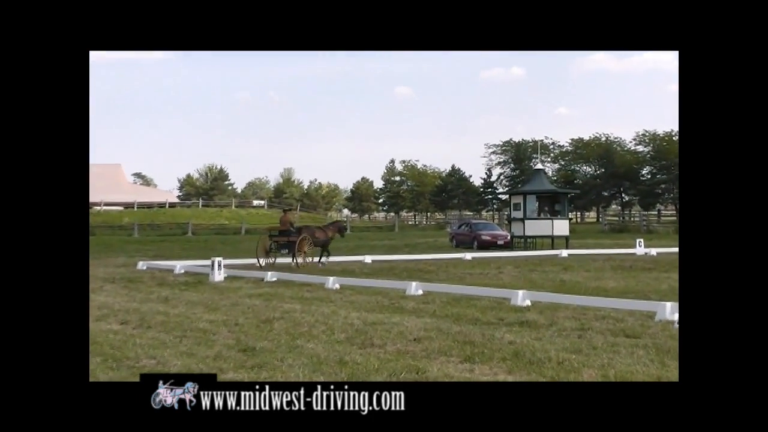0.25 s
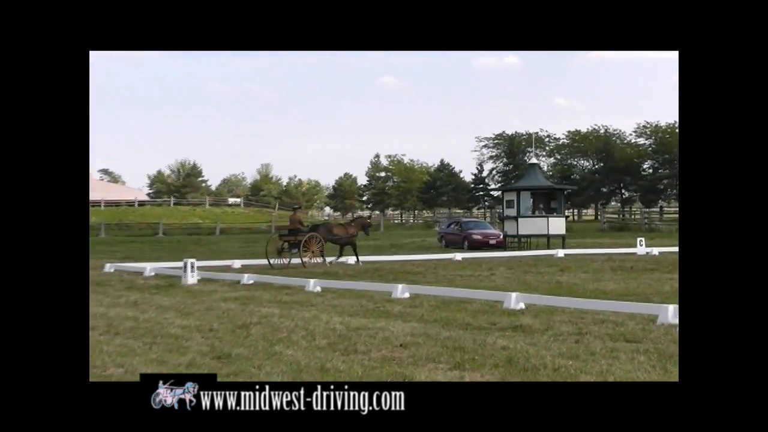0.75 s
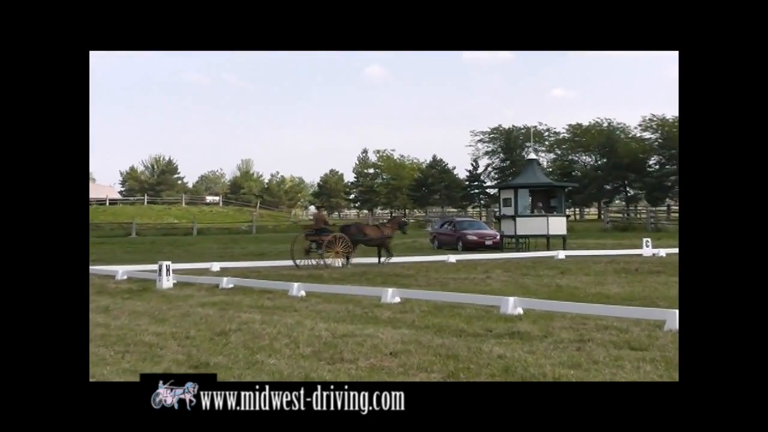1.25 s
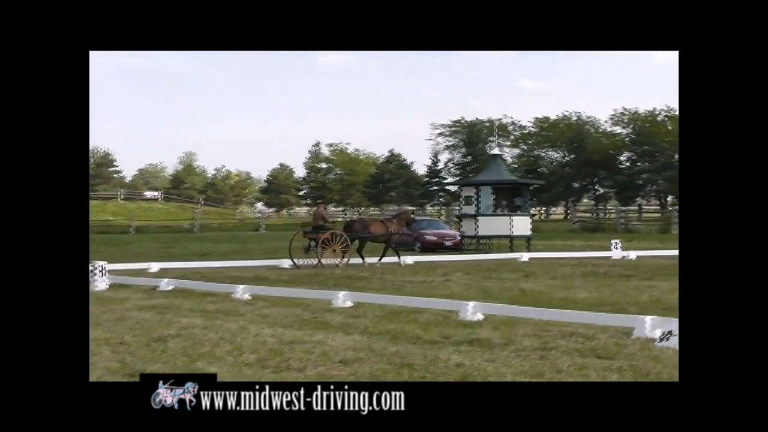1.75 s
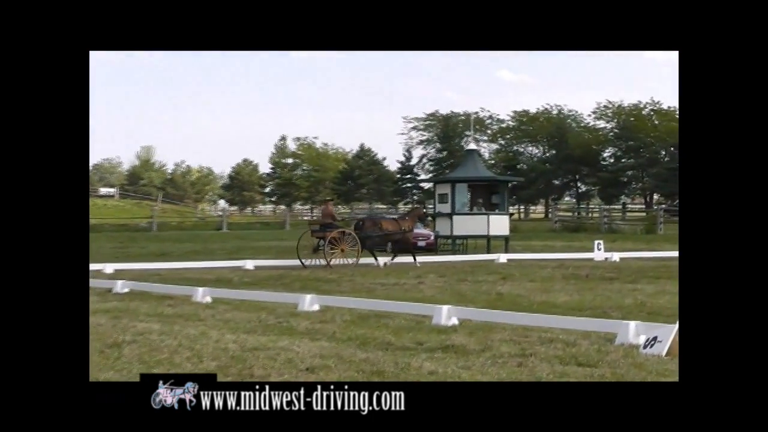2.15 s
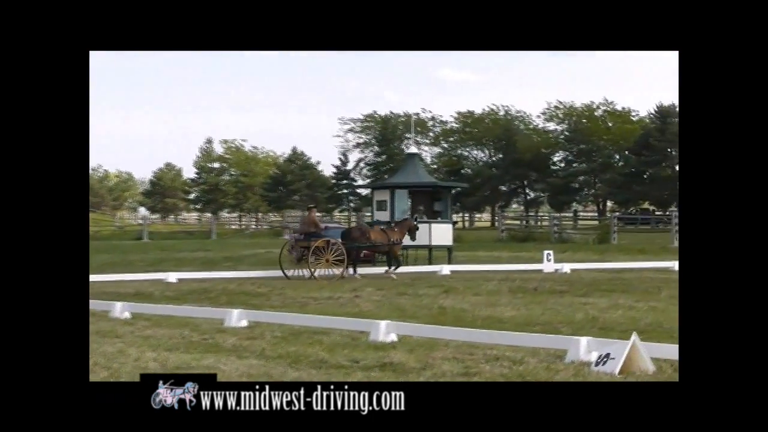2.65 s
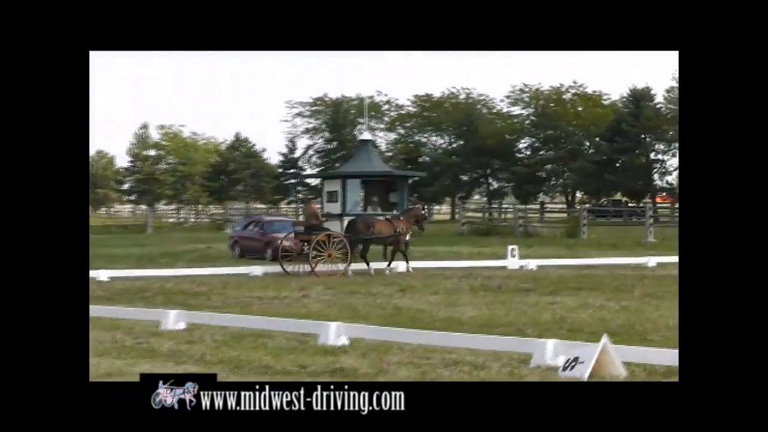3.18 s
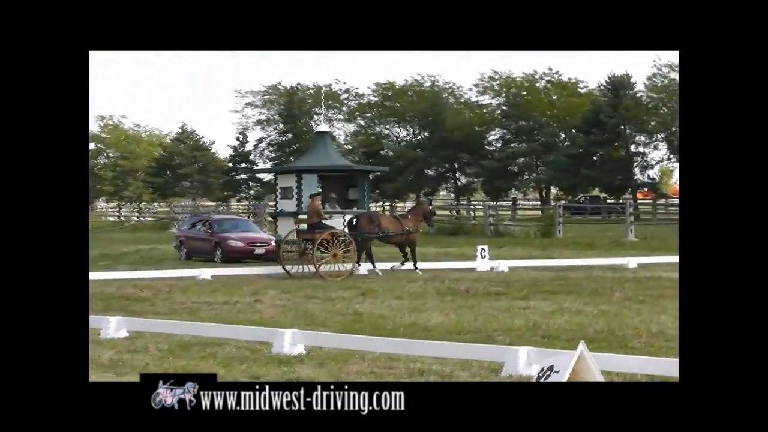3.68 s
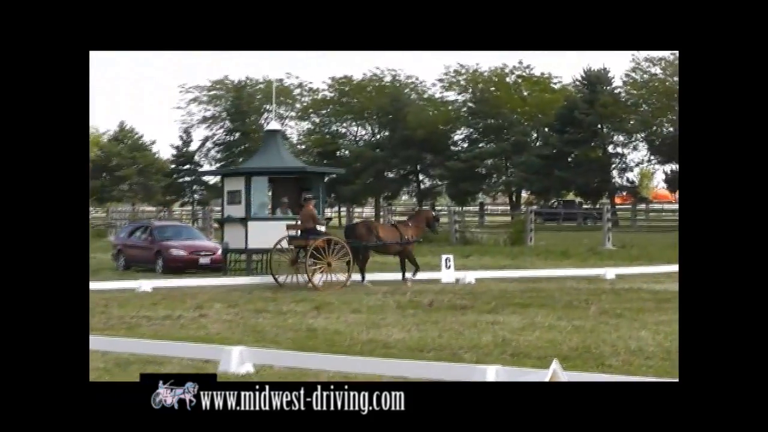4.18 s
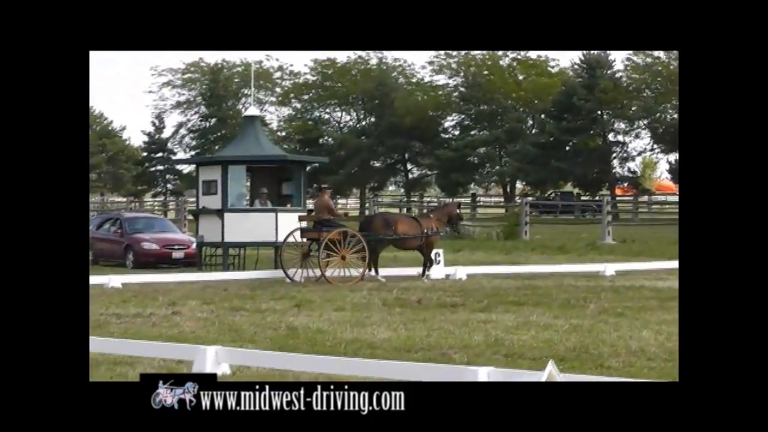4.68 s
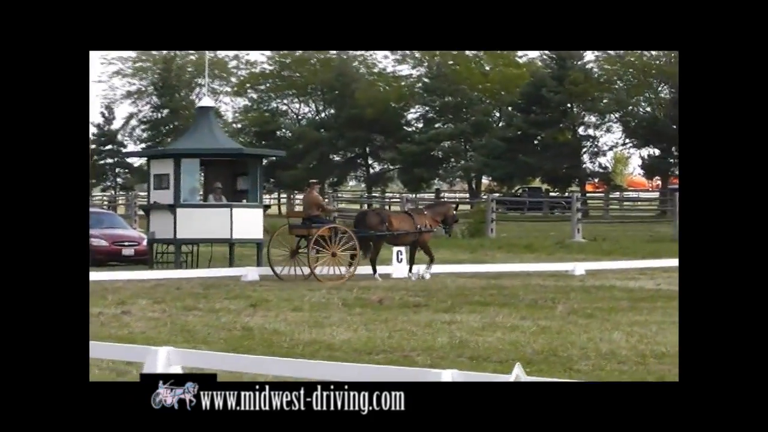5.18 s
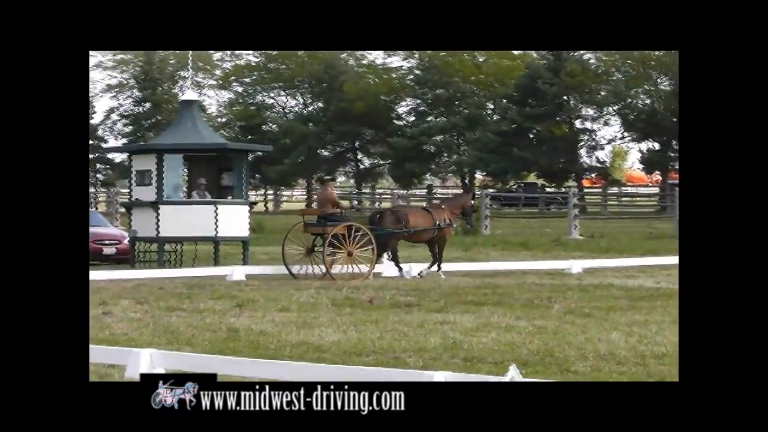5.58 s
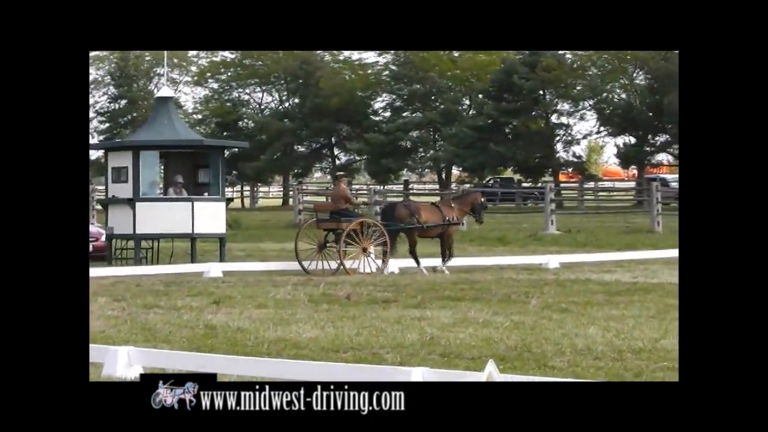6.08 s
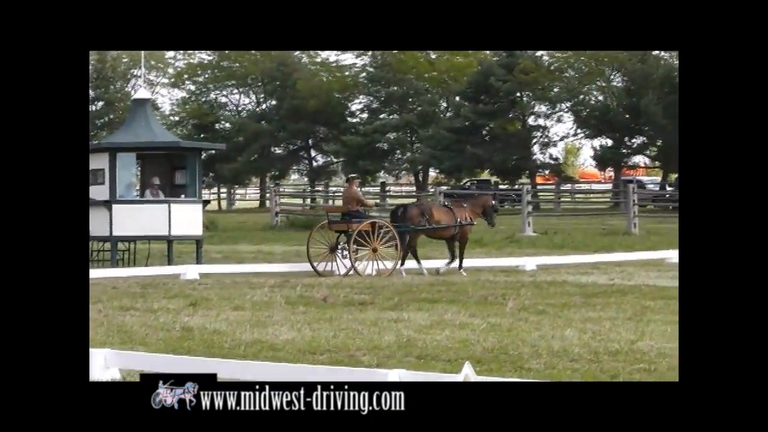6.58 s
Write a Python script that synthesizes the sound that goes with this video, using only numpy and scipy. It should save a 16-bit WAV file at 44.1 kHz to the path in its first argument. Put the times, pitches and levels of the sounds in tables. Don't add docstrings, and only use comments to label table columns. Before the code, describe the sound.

Outdoors in an open summer field, captured in stereo by an exposed camera microphone. Throughout the nearly seven seconds, a light propeller aircraft drones: low buzzing blade and exhaust tones inside a rough, turbulent roar, fluttering in strength and sinking slightly in pitch, coloured by a hollow, slowly shifting ground echo. From 0 to 0.9 seconds wind hits the microphone in dense, deep thumps; later bumps come around 2.1, 3.7 and 6.6. Close on the right, a cricket gives very high, short pulsing trills about four times a second, over a faint insect chorus. Leaves rustle softly, mainly early. Tiny dry ticks are scattered throughout. A thin bird peep comes at 2.3, low pips at 4.9 and a quick pair at 6.2. Faint sparrow chatter and lower crickets increase after 3.5. A crisp twig snap stands out at 5.8, slightly right. The horse and carriage are not heard.

```python
import sys
import numpy as np
from scipy import signal
from scipy.fft import rfft, irfft, next_fast_len
from scipy.io import wavfile
from scipy.ndimage import uniform_filter1d, map_coordinates

SR = 44100
rng = np.random.default_rng(int(sys.argv[2]) if len(sys.argv) > 2 else 0)


def dump(signal):
    limited = np.clip(np.atleast_2d(signal).T, -1, 1)
    pcm = np.round(limited * 32767).astype(np.int16)
    wavfile.write(sys.argv[1], SR, pcm)


def invert_db(x):
    u = np.asarray(x, float) / 20
    return 10 ** u


N = 301203

# f/Hz, density/dB
AIR_SPECTRUM = [(1530, -37), (2600, -3.5), (3280, -7.5), (4360, -2.5), (4730, -1.5), (5490, -4), (6980, -8),
                (8800, 0.5), (9990, -10.5), (14100, -12.5), (15500, -14.5)]
# f/Hz, density/dB
LEAF_SPECTRUM = [(5000, -120), (7000, -8), (9500, 6.5), (11000, 6), (12500, -3), (15000, -19),
                 (16000, -120)]
# middle/s, length/s, peak/dB
RUSTLES = [(.17, 0.18, -69), (.48, 0.35, -70), (.84, .2, -67), (1.15, 0.22, -70), (1.55, 0.33, -77),
           (1.85, 0.13, -71), (2, 0.18, -70), (2.33, .15, -77), (2.8, .3, -90), (3.4, .2, -75),
           (6.7, .15, -79)]
# f/Hz, density/dB
CHATTER_SPECTRUM = [(2300, -120), (2900, -5), (3900, 1.5), (5000, -3), (5600, -14), (6500, -120)]
# middle/s, length/s, peak/dB
SPARROW_BOUTS = [(.62, 0.14, -72), (.97, 0.11, -66), (1.6, 0.32, -71), (3.3, 0.22, -78), (4.02, 0.19, -68),
                 (4.45, 0.41, -73), (4.93, 0.34, -68), (5.5, 0.21, -71), (6.05, 0.49, -66.5),
                 (6.32, 0.11, -74), (6.58, 0.15, -63), (6.83, .1, -68)]
# middle/s, length/s, peak/dB
LOW_CRICKET_BOUTS = [(1, .4, -91), (1.45, .4, -81), (2.45, 0.25, -79), (2.78, .06, -72), (2.95, .1, -71),
                     (3.08, .08, -70), (3.26, .14, -70), (3.39, .07, -72), (3.6, 0.1, -66), (3.78, .1, -72),
                     (3.96, .3, -68), (4.2, .07, -69), (4.38, .16, -69.5), (4.55, 0.12, -67),
                     (4.95, 0.45, -71), (5.5, .4, -72), (6, 0.45, -70), (6.28, 0.21, -64), (6.6, 0.39, -69),
                     (6.83, 0.092, -70)]
# t/s, length/s, from f/Hz, to f/Hz, peak/dB
PEEPS = [
    (0.388, .045, 5270, 5100, -68),
    (1.128, 0.021, 5200, 5200, -69.5),
    (2.315, 0.02, 5420, 5180, -56),
    (3.058, 0.019, 5140, 5150, -66),
    (6.227, 0.032, 5300, 5420, -60),
    (6.25, 0.037, 5180, 5030, -65),
]
# t/s, length/s, from f/Hz, to f/Hz, peak/dB
PIPS = [
    (2.066, .035, 7000, 6400, -70),
    (4.886, .03, 4270, 3550, -58),
    (4.945, .02, 3300, 3850, -61),
    (6.7, .025, 5900, 5800, -66),
    (6.7, .03, 11800, 11500, -70),
    (.05, .02, 10300, 9500, -61),
]
# t/s, peak/dB, L-R/dB, t60/s, wood/dB
CRACKS = [(5.833, -32.5, -5, 0.0048, 1.5), (.886, -47, -3, 0.003, -14), (1.45, -43, -4, 0.0033, -16),
          (2.025, -50, -6, .003, -12), (2.056, -49, -5, .003, -13), (3.094, -57, -9, .003, -14),
          (.042, -46, 0, .002, -8), (.479, -48, -4, .003, -14), (.783, -56, -3, .003, -14),
          (.82, -51, -3, .003, -14), (2.739, -52, -4, .003, -14), (3.311, -52, -2, .003, -14),
          (3.634, -48, -3, .003, -14), (3.814, -53, -1, .003, -14), (4.337, -53, -2, .003, -12),
          (5.8348, -40.5, -5, .004, 5)]
# f/Hz, gain/dB
CRACK_COLOUR = [(600, -40), (1600, 17.5), (2200, 11), (3000, -11), (4000, -2), (7000, 3.5), (11500, -8),
                (16000, -29)]
# t/s, wing strokes, peak/dB
CHIRPS = [(0.0752, 6, -47), (0.3132, 6, -48), (0.5492, 6, -47), (0.793, 5, -46.5), (1.04, 6, -47.5),
          (1.2945, 6, -46), (1.548, 6, -46), (1.7793, 5, -45.5), (2.023, 7, -45), (2.2657, 6, -45),
          (2.4906, 7, -46), (2.737, 8, -44.5), (2.9995, 6, -45.5), (3.2394, 5, -45), (3.4716, 6, -45),
          (3.7012, 8, -46), (3.9644, 7, -44), (4.224, 7, -45), (4.4773, 7, -45.5), (4.76, 6, -44.5),
          (4.9883, 6, -46), (5.221, 6, -44.5), (5.4391, 6, -46), (5.677, 7, -44.5), (5.9327, 7, -46),
          (6.179, 7, -44), (6.425, 6, -44), (6.6629, 7, -46)]
# t/s, level/dB
WIND_STRENGTH = [(0.0, -23.5), (0.15, -29.5), (0.5, -32), (0.68, -31), (1.23, -37), (1.75, -35.5),
                 (2.5, -36.5), (2.76, -33), (2.99, -37), (3.65, -37.5), (3.99, -42), (4.37, -34),
                 (4.75, -41), (5.16, -34), (5.8, -43.5), (6.68, -32), (6.83, -37)]
# f/Hz, density/dB
RUMBLE_SPECTRUM = [(10, -120), (18, 9), (40, 2), (80, -5.5), (160, -16), (400, -66), (600, -120)]
# t/s, peak/dB, L-R/dB, f/Hz
THUMPS = [(.034, -10, 10, 38), (.085, -10, 5, 70), (.147, -9.5, 1, 81), (.19, -11.5, 2, 72),
          (.274, -3, -5, 58), (.316, -4, -4, 91.5), (.344, -11.5, 1, 67), (.422, -20, -12, 56),
          (.564, -5.5, -3, 86), (.614, -12, 8, 65), (.664, -4, -1, 40), (.681, -3.5, 1, 36),
          (.763, -12, -2, 58.5), (.831, -18, 17.5, 68), (1.707, -19, 2, 50), (1.735, -17, -1, 47),
          (1.951, -21.5, 10, 48.3), (2.098, -6.5, 0.5, 66), (2.138, -14.5, -11, 39), (2.439, -15, -4, 59),
          (2.63, -13.5, 0, 65), (2.713, -19.5, -18, 36.3), (2.905, -18, -5, 47.4), (3.651, -8.5, 8, 88.5),
          (3.68, -6, 5, 50), (3.802, -9, 2, 69), (4.211, -17.5, 0, 71), (5.064, -16, 8, 64),
          (6.25, -14, 6, 39), (6.641, -6, 3, 57), (6.39, -24, 0, 50), (6.505, -20, 2, 45),
          (.71, -13, 2, 40), (1.84, -22, 2, 35), (2.76, -28, -6, 45), (5.18, -24, 12, 55)]
# t/s, rate/Hz
BLADE_RATE = [(0, 86), (0.8, 84.8), (1.6, 84.08), (2.8, 83.25), (4.4, 82.55), (5.2, 81.85), (6, 81.15),
              (6.83, 80)]
# t/s, propeller level/dB, exhaust level/dB
TONE_LEVELS = [(0, -35.5, -50.5), (.5, -39, -39), (.93, -42, -42.5), (1.55, -36, -46), (2.17, -44.5, -52.5),
               (2.79, -39, -55), (3.1, -34.5, -43), (3.72, -38, -49), (4.1, -32.5, -41), (4.4, -40, -34),
               (4.65, -38.5, -47), (4.96, -35.5, -34.5), (5.58, -40.5, -37.5), (5.89, -37.5, -37.5),
               (6.5, -36, -32.5), (6.83, -53, -37)]
# multiple of blade rate, rms/dB
BLADE_ORDERS = [(2, -49.5), (4, -53), (6, -50.5), (7, -61.5), (8, -54.5), (9, -51.5), (10, -69)]
# multiple of a third of the firing rate, rms/dB
EXHAUST_ORDERS = [(3, -38.5), (9, -53.5), (15, -54), (18, -67), (24, -52.5), (36, -59.5), (50, -69.5),
                  (51, -75), (52, -58), (53, -70), (56, -63), (60, -66)]
# multiple of firing rate, middle/s, length/s, peak/dB
EXHAUST_GLINTS = [(16, 1.52, 0.59, -46), (16, 3.5, 1.2, -57), (16, 4.05, 0.49, -50), (16, 5.01, 1.5, -48),
                  (16, 5.94, 0.86, -46), (16, 6.59, 0.63, -45.5), (17, 0.16, 2, -64), (17, 8.2, 0.36, -42),
                  (18, 1.52, 0.97, -49), (18, 2.41, 0.33, -52), (18, 3.2, 0.51, -51), (18, 4.2, 0.63, -57),
                  (19, 2.9, 0.45, -56), (19, 3.66, 1.7, -56), (19, 14, 0.35, -56), (20, 1.64, 0.56, -54.5),
                  (17, 0.92, 0.69, -54), (17, 3.8, 0.78, -52), (21, 6.15, 0.55, -56), (13, 7.1, 1.1, -48),
                  (12, 1.56, .5, -51), (13, 3.62, 0.34, -49.5)]
# multiple of blade rate, middle/s, length/s, peak/dB
BLADE_GLINTS = [
    (26, 5.76, 0.55, -55.5),
    (30, 4.6, 0.53, -66),
    (30, 6.1, 0.49, -63),
    (30, 6, .4, -64),
    (31, 6.8, 0.65, -76),
]
# t/s, level/dB, clear air/dB
ROAR_LEVELS = [(0.0, -38, -12), (0.32, -36.5, -13.5), (0.64, -40.5, -8), (1.5, -36.5, -9.5), (2, -40, -9),
               (2.8, -40, -7), (3, -36, -7), (3.56, -38, -8.5), (4.07, -34.5, -10.5), (4.7, -38.5, -4.5),
               (5, -35, -7.5), (5.54, -37, -10.5), (5.9, -34, -8.5), (6.83, -36.5, -7)]
# f/Hz, density/dB
BODY_SPECTRUM = [(60, -120), (90, -6), (200, 1), (420, 0), (750, 0.5), (1200, -8.5)  , (1800, -21),
                 (2500, -120)]
# f/Hz, density/dB
EDGE_SPECTRUM = [(700, -120), (1000, -11), (1600, -4), (2050, -12.5), (2400, -25), (3000, -32),
                 (5000, -40.5), (6000, -120)]
# f/Hz, density/dB
RASP_SPECTRUM = [(1300, -120), (1600, -6), (2000, -6), (2250, -13), (2450, -22), (3000, -120)]
# middle/s, length/s, peak/dB
CLEARINGS = [(.05, 0.26, -50), (.45, 0.33, -52), (.95, 0.42, -52), (1.27, 0.12, -55), (1.552, 0.68, -54),
             (2.45, 0.21, -50.5), (3.15, 0.61, -59), (3.6, 0.16, -50), (4, 0.32, -49), (4.45, 0.4, -49.5),
             (4.9, .35, -50.5), (5.9, 0.55, -55), (6.3, 0.18, -70), (6.65, .4, -63)]
# t/s, lag/ms
GROUND_LAG = [(0, 4.26), (1.1, 4.574), (3.4, 5.43), (5.7, 5.706), (6.83, 5.95)]

FIRING_PER_BLADE = 1.2345
THIRD_DB, THIRD_FADE_DB_PER_S = -3, 1.3
IN_STEP_DB, OPPOSE_PER_DB = -11.5, 0.01
FLUTTER_DB, FLUTTER_SPREAD_DB, FLUTTER_HZ = 8, 1.5, 50
CORE_DB, CORE_PITCH_RATIO = -12, 1.18
PORT_TOP_HZ = 420
TURF_LAG_S, TURF_SHARE = .00037, .8


def unit(x):
    return x / np.sqrt(np.mean(x ** 2) + 1e-20)


def curves(rows):
    s, *cols = np.transpose(rows)
    return [np.interp(np.arange(N) / SR, s, c) for c in cols]


def wobble(rate_hz):
    knots = rng.standard_normal(int(N * rate_hz / SR) + 4)
    return map_coordinates(knots, [np.arange(N) * rate_hz / SR])


def swell(middle_s, length_s, db):
    return invert_db(db) * np.exp(-.5 * ((np.arange(N) / SR - middle_s) / (0.28 * length_s)) ** 2)


def bouts(rows, rest_db):
    return invert_db(rest_db) + sum(swell(*row) for row in rows)


def sides(left_db, right_db):
    return invert_db(np.array([[left_db], [right_db]]))


def filtered(x, response):
    m = next_fast_len(N + 8192)
    return irfft(rfft(x, m) * response(np.fft.rfftfreq(m, 1 / SR)), m)[..., :N]


def spectrum_db(rows, f_hz):
    hz, db = np.transpose(rows)
    return np.interp(np.log(f_hz + 1), np.log(hz), db)


def noise(spectrum, patchy_db, channels=1):
    z = signal.stft(rng.standard_normal((channels, N)), nperseg=512)[2]
    patches = uniform_filter1d(rng.standard_normal(z.shape[1:]), 5, 0)
    patches = unit(uniform_filter1d(patches, 16, 1))
    x = signal.istft(z * invert_db(patchy_db * patches), nperseg=512)[1][:, :N]
    return unit(filtered(x, lambda f: invert_db(spectrum_db(spectrum, f))))


def add(track, s, x):
    part = track[..., max(round(s * SR), 0):][..., :x.shape[-1]]
    part += x[..., :part.shape[-1]]


def glide(length_s, from_hz, to_hz):
    u = np.linspace(0, 1, int(length_s * SR))
    phase = 2 * np.pi * np.cumsum(from_hz + (to_hz - from_hz) * u) / SR
    return phase, np.sin(np.pi * u) ** 0.35


def chorus(hz, spread, rate_hz, length_s, count, bouts_db):
    out, t = np.zeros((2, N)), np.arange(N) / SR
    for tune, side, pace in rng.standard_normal((count, 3)):
        cycle = (rate_hz * (1 + 0.097 * pace) * t + 0.48 * wobble(5.4)) % 1
        beat = np.minimum(cycle / np.clip(rate_hz * length_s, .05, 1), 1)
        pitch_hz = hz * (1 + spread * np.clip(tune, -1.6, 1.6)) * (1 - 0.04 * (beat - .5))
        stroke = np.sin(np.pi * beat) * np.sin(2 * np.pi * np.cumsum(pitch_hz) / SR)
        out += stroke * invert_db(bouts_db * wobble(9.9)) * sides(1.9 * side, -1.5 * side)
    return unit(out)


def insects():
    high = chorus(hz=8530, spread=.036, rate_hz=18, length_s=0.023, count=40, bouts_db=5.0)
    low = chorus(hz=4800, spread=0.019, rate_hz=38, length_s=0.015, count=8, bouts_db=1.5)
    low *= bouts(LOW_CRICKET_BOUTS, rest_db=-97)
    return invert_db(-69.5) * high * sides(-2.5, 2.5) + low * sides(1.5, -1.5)


def sparrows():
    flutter = invert_db(2.2 * wobble(30))
    chatter = flutter * noise(CHATTER_SPECTRUM, patchy_db=0.3)
    return bouts(SPARROW_BOUTS, rest_db=-81.0) * chatter * sides(1.5, -1.5)


def leaves():
    rubbing = invert_db(4.0 + 1.4 * wobble(35) + 1.9 * wobble(220))
    hiss = rubbing * noise(LEAF_SPECTRUM, patchy_db=0.5, channels=2)
    return bouts(RUSTLES, rest_db=-77.5) * hiss * sides(-5, .1)


def field():
    air = invert_db(-63.0) * noise(AIR_SPECTRUM, patchy_db=1.5, channels=2) * sides(.8, -.8)
    return insects() + sparrows() + leaves() + air


def birds():
    out = np.zeros(N)
    for rows, octave_db in ((PEEPS, -58), (PIPS, -82)):
        for s, length_s, from_hz, to_hz, db in rows:
            phase, shape = glide(length_s, from_hz, to_hz)
            jitter = uniform_filter1d(rng.standard_normal(len(phase)), 90)
            phase = phase + np.cumsum(jitter) * 0.018
            add(out, s, shape * (invert_db(db) * np.sin(phase) + invert_db(octave_db) * np.sin(2 * phase)))
    return out


def twig():
    out, t = np.zeros((2, N)), np.arange(SR // 40) / SR
    lead_s = .003
    for s, db, pan_db, t60_s, wood_db in CRACKS:
        decay = invert_db(-60 * (t - lead_s) / t60_s) + invert_db(-26 - 60 * t / .04)
        burst = .6 * rng.standard_normal(len(t)) * (t > lead_s) * decay
        burst[round(lead_s * SR)] += 4.5

        def colour(f):
            wood = invert_db(spectrum_db(CRACK_COLOUR, f) + wood_db / (1 + (f / 8000) ** 4))
            return wood * (1 - TURF_SHARE * np.exp(-2j * np.pi * f * TURF_LAG_S))

        crack = filtered(burst, colour)[:len(t)]
        add(out, s - lead_s, invert_db(db + 2.5) * sides(pan_db / 2, -pan_db / 2) * crack)
    return out


def cricket():
    out = np.zeros(N)
    for s, strokes, db in CHIRPS:
        for k in range(round(strokes) + 1):
            tired = max(k + 2 - round(strokes), 0)
            top_hz = 9200 * (1.012 - 0.0098 * (k == 0) - 0.014 * tired)
            phase, shape = glide(0.006, top_hz * 1.004, top_hz * 0.977)
            start_s = s - .0007 + .0089 * k + rng.normal(0, 0.000086)
            level = invert_db(db - 3.9 * tired + rng.normal(0, 0.65))
            add(out, start_s, level * shape * np.sin(phase + 7 * rng.random()))
    return out * sides(-11.5, .1)


def eddy(db, pan_db, hz, turn, lead_s):
    opposition = np.arccos(np.clip(OPPOSE_PER_DB * (IN_STEP_DB - db), -1, 1))
    phase = turn + np.array([[0], [opposition]])
    cycles = np.arange(-lead_s * SR, 0.0263 * SR) / SR * hz
    push = np.exp(-np.abs(cycles / 0.22) ** 0.71) * np.cos(2 * np.pi * cycles + phase)
    core = np.exp(-np.abs(cycles / 0.31)) * np.sin(2 * np.pi * CORE_PITCH_RATIO * cycles + 2 * phase)
    return invert_db(db) * sides(pan_db / 2, -pan_db / 2) * (push + invert_db(CORE_DB) * core)


def wind():
    lumps = invert_db(1.03 * np.array([wobble(11), wobble(22)]))
    strength_db = curves(WIND_STRENGTH)[0]
    out = invert_db(strength_db + 6.0) * unit(lumps * noise(RUMBLE_SPECTRUM, patchy_db=3.0, channels=2))
    when_s = rng.random(size=120) * N / SR
    size, side, tune = rng.standard_normal(size=(3, 120))
    small_db = strength_db[(when_s * SR).astype(int)] + FLUTTER_DB + FLUTTER_SPREAD_DB * size
    small = zip(when_s, small_db, 6 * side, FLUTTER_HZ * (1 + 0.24 * tune))
    lead_s = .03
    for s, db, pan_db, hz in [*THUMPS, *small]:
        push = eddy(db, pan_db, hz, 2 * np.pi * rng.random(), lead_s)
        skip = max(round((lead_s - s) * SR), 0)
        add(out, s - lead_s, push[:, skip:])
    return filtered(out, lambda hz: 1 / (1 + (hz / PORT_TOP_HZ) ** 4))


def tone(turn, k, db, flicker_db, sway=1.0):
    level = invert_db(db + 0.5 + flicker_db * (wobble(7) + 0.39 * wobble(19)))
    phase_sway = sway * (0.7 * wobble(7) + 0.43 * wobble(17))
    return level * np.sin(k * turn + phase_sway + 7 * rng.random())


def strong_tones(turn):
    blade_db, exhaust_db = curves(TONE_LEVELS)
    third_db = blade_db + THIRD_DB - THIRD_FADE_DB_PER_S * np.arange(N) / SR
    beating_db = blade_db + 0.5 - 4.7 * (curves(GROUND_LAG)[0] - 4.6)
    out = tone(turn, 5, blade_db - 1, flicker_db=2.2, sway=.7)
    out += tone(turn, FIRING_PER_BLADE * 2, exhaust_db, flicker_db=2.5, sway=1.1)
    out += tone(turn, 3, third_db, flicker_db=2.5)
    out += tone(turn, FIRING_PER_BLADE * 4, beating_db, flicker_db=0.5, sway=0.93)
    for k, s, length_s, db in EXHAUST_GLINTS:
        glint = tone(turn, FIRING_PER_BLADE * round(k), 0, flicker_db=2.5, sway=1.65)
        out += swell(s, length_s, db) * glint
    for k, s, length_s, db in BLADE_GLINTS:
        out += swell(s, length_s, db) * tone(turn, round(k), 0, flicker_db=5.0, sway=1.5)
    return out


def weak_tones(turn):
    out = sum(tone(turn, round(k), db, flicker_db=3.5) for k, db in BLADE_ORDERS)
    for k, db in EXHAUST_ORDERS:
        out += tone(turn, round(k) * FIRING_PER_BLADE / 3, db, flicker_db=2.5 + k / 30)
    return out


def ground_echo(direct):
    dull = filtered(direct, lambda hz: 0.63 / (1 + (hz / 950) ** 3))
    lag_samples = curves(GROUND_LAG)[0] * SR / 1000
    return np.interp(np.arange(N) - lag_samples, np.arange(N), dull)


def tree_scatter(heard):
    n = SR // 8
    tail = rng.standard_normal(n) * invert_db(-60 * np.arange(n) / SR / 0.034)
    return invert_db(-15) * wobble(5) * signal.fftconvolve(heard, tail / np.linalg.norm(tail))[:N]


def aircraft():
    turn = 2 * np.pi * np.cumsum(curves(BLADE_RATE)[0]) / SR
    body_db, clear_db = curves(ROAR_LEVELS)
    body = invert_db(2.0) * noise(BODY_SPECTRUM, patchy_db=0.5)[0]
    edge = invert_db(clear_db - 1.0) * noise(EDGE_SPECTRUM, patchy_db=2.5)[0]
    direct = invert_db(body_db) * (body + edge) + invert_db(body_db + 37.5) * weak_tones(turn)
    rasp = sum(swell(*row) for row in CLEARINGS) * noise(RASP_SPECTRUM, patchy_db=-0.5)[0]
    heard = direct + ground_echo(direct) + strong_tones(turn) + rasp
    scattered = tree_scatter(heard)
    shaded = filtered(heard, lambda hz: invert_db(np.outer([1, -1], 0.21 + 2.0 * hz / (hz + 900))))
    return shaded + [scattered, -scattered]


def scene():
    return field() + birds() + twig() + cricket() + wind() + aircraft()


def low_pass(x):
    return signal.sosfilt(signal.butter(12, 15710, fs=SR, output="sos"), x)


def record(dry):
    soft = dry / (1 + np.abs(dry / 0.9) ** 6) ** (1 / 6)
    return low_pass(soft)


dry = scene()
out = record(dry)
dump(out)
```